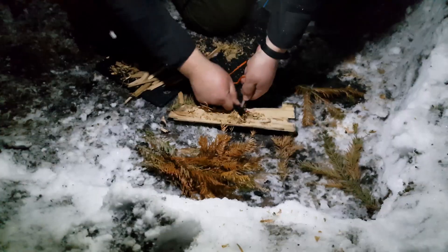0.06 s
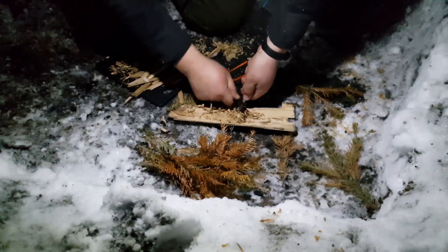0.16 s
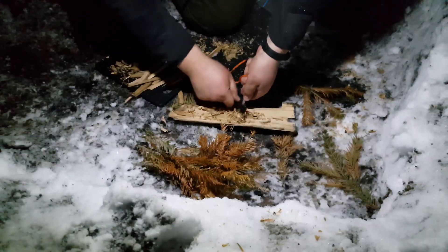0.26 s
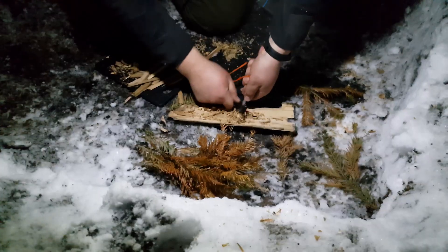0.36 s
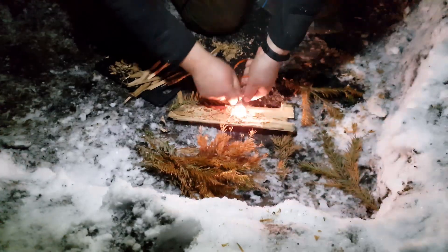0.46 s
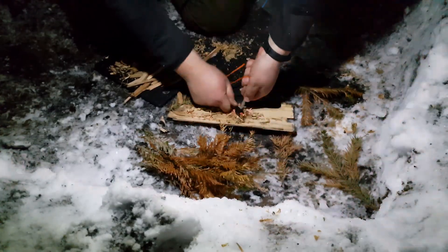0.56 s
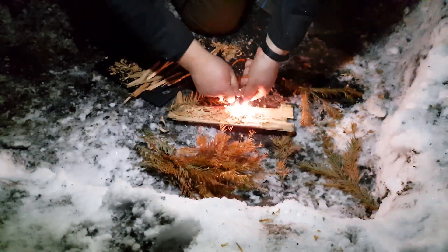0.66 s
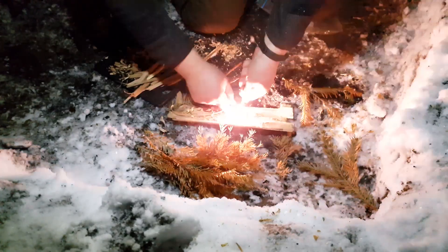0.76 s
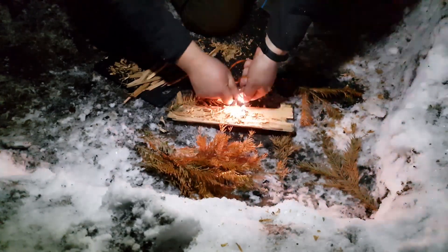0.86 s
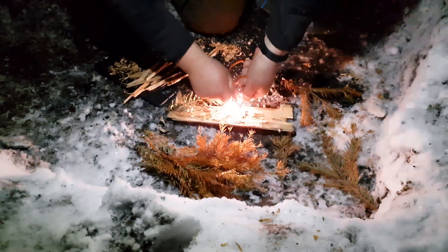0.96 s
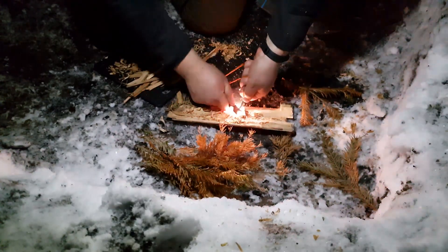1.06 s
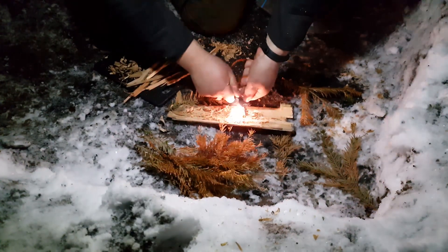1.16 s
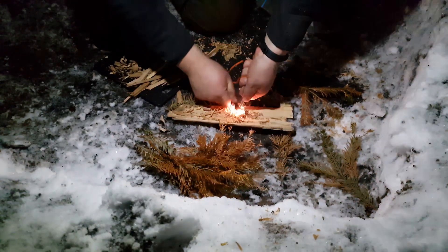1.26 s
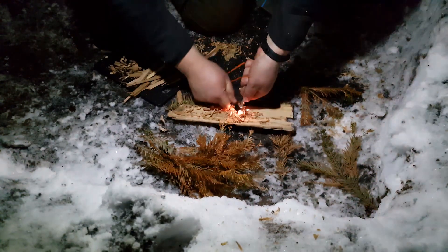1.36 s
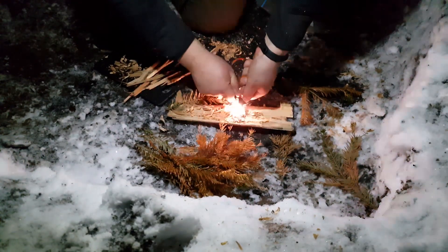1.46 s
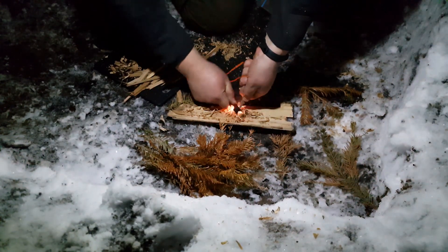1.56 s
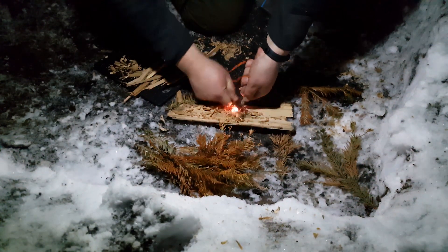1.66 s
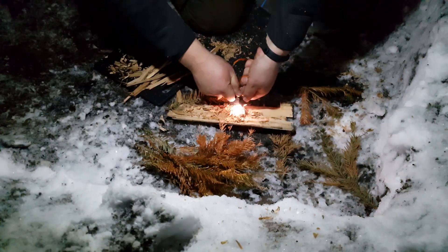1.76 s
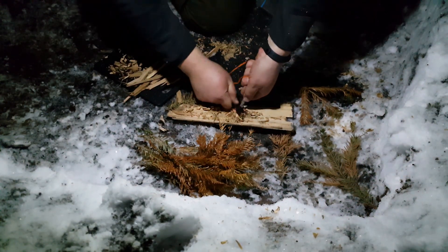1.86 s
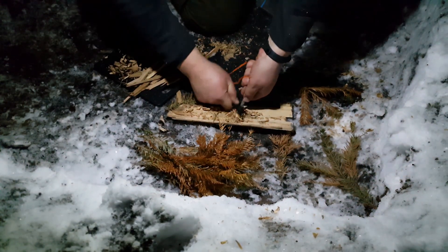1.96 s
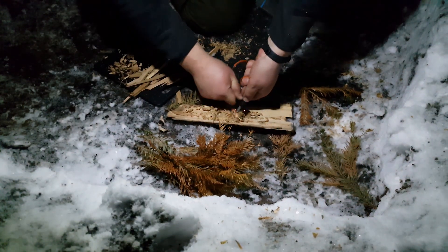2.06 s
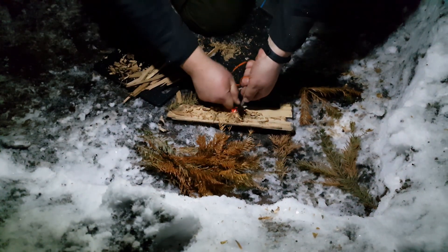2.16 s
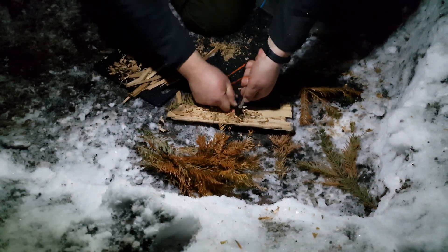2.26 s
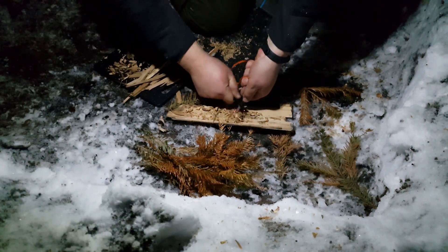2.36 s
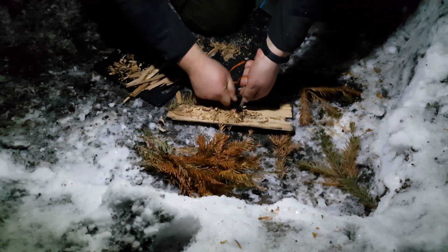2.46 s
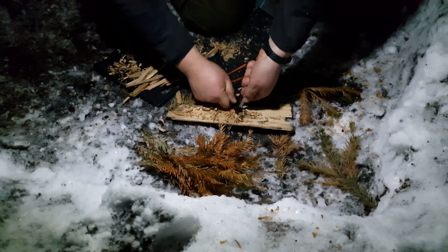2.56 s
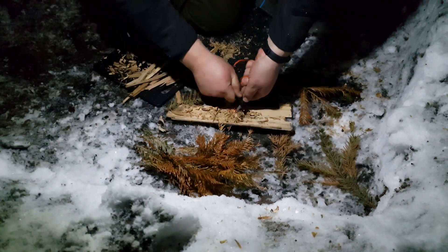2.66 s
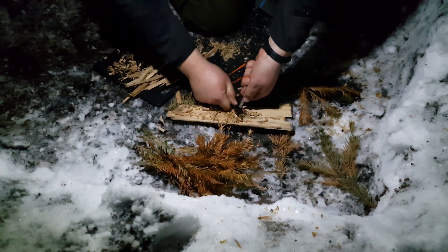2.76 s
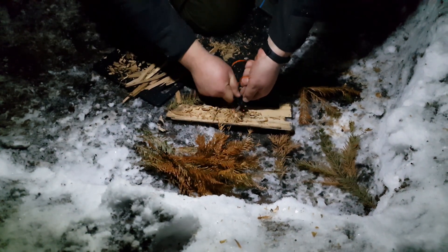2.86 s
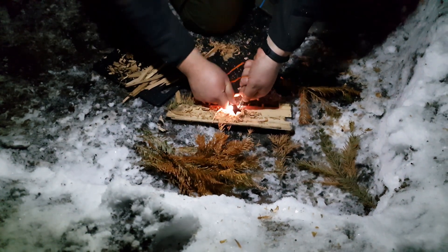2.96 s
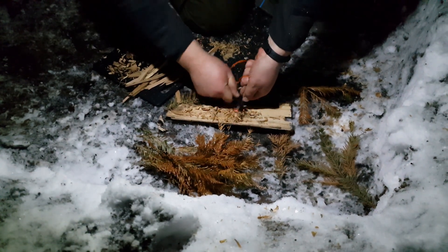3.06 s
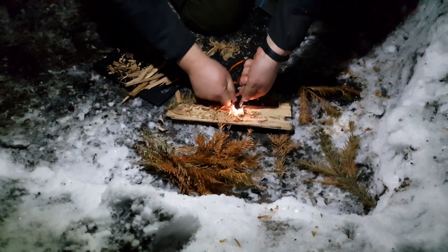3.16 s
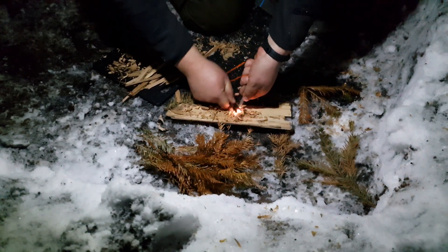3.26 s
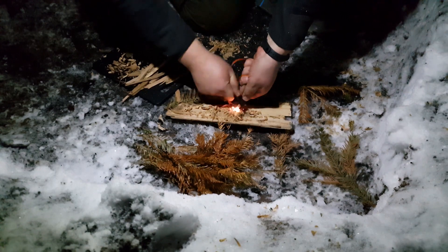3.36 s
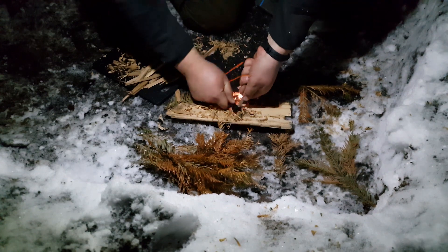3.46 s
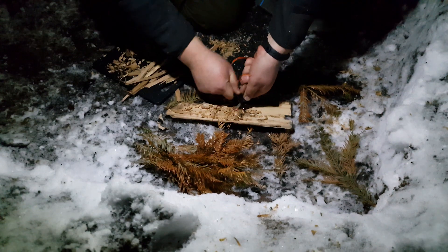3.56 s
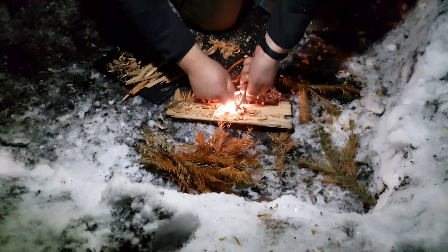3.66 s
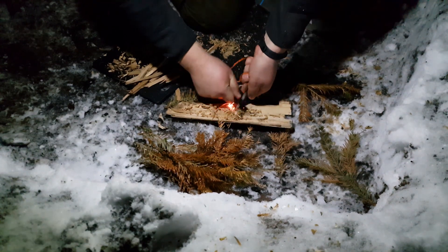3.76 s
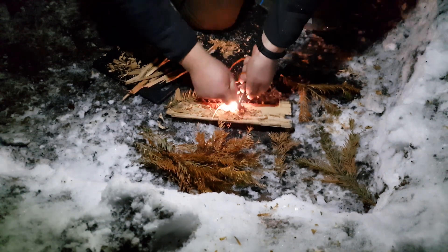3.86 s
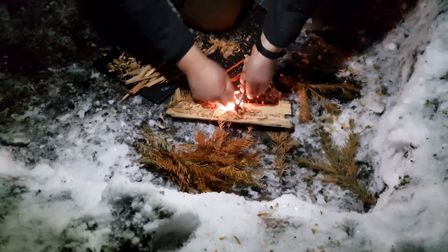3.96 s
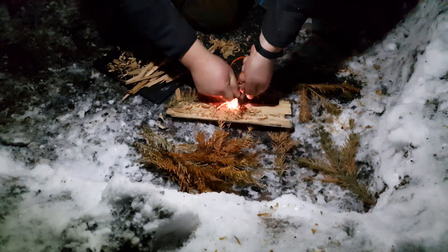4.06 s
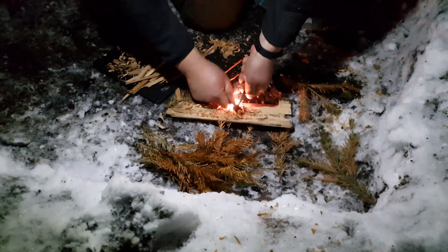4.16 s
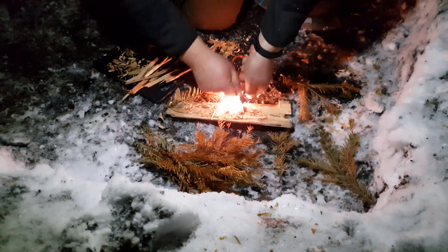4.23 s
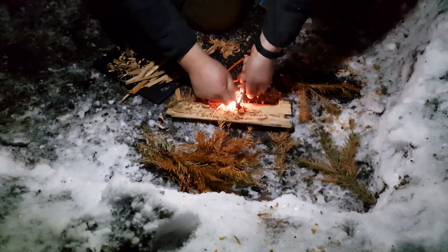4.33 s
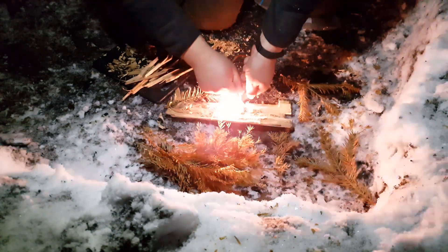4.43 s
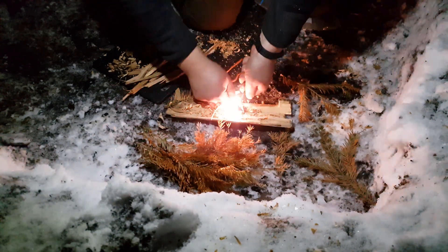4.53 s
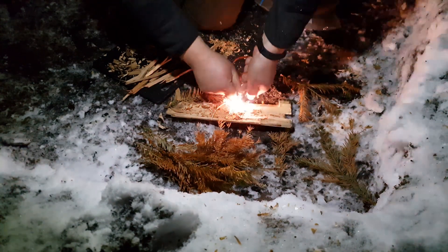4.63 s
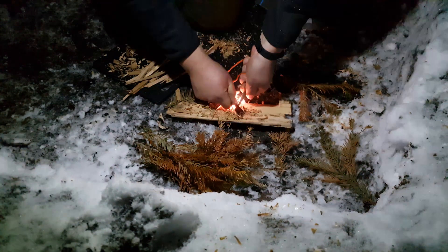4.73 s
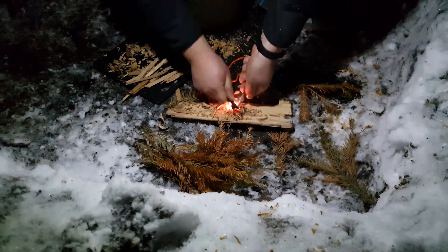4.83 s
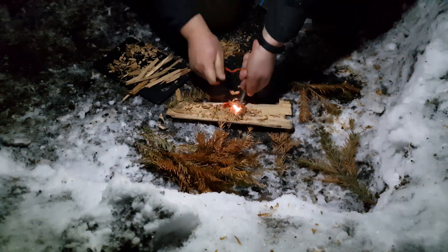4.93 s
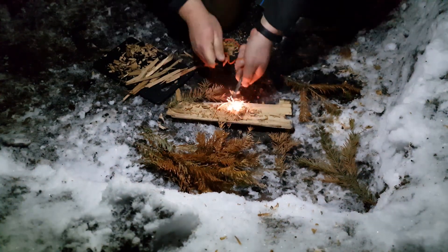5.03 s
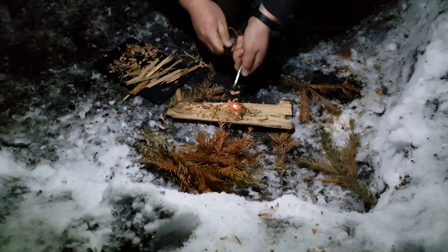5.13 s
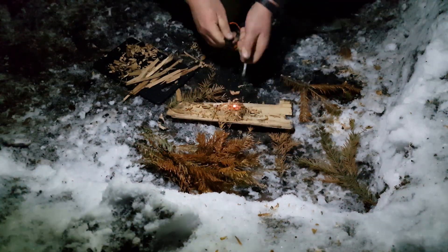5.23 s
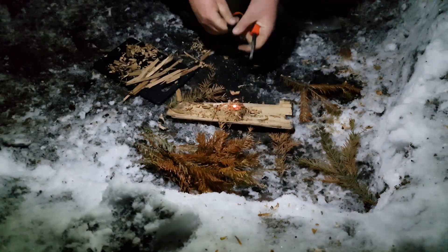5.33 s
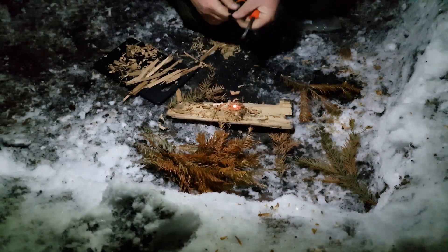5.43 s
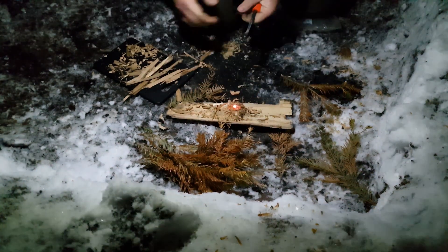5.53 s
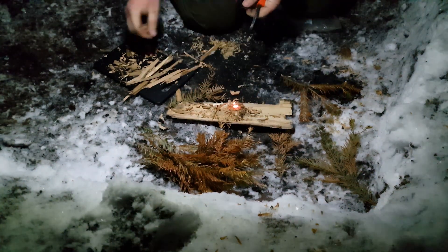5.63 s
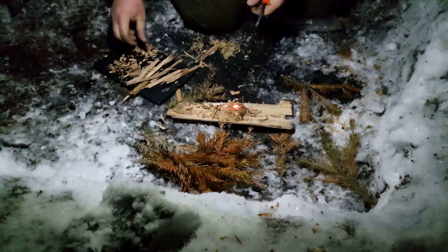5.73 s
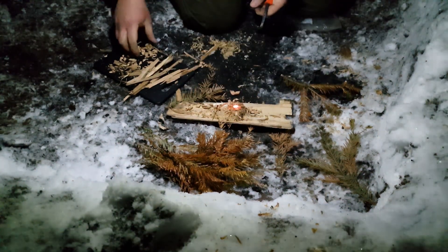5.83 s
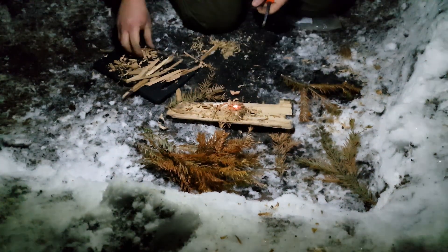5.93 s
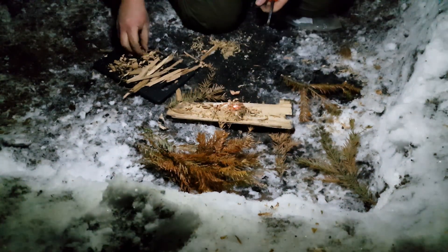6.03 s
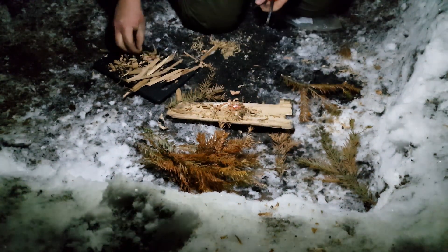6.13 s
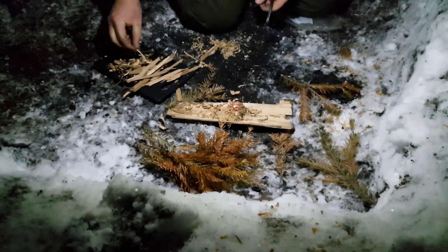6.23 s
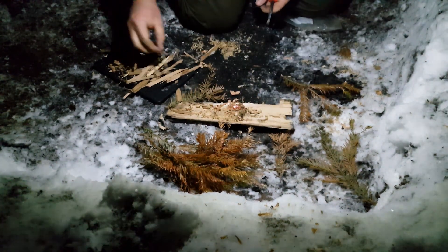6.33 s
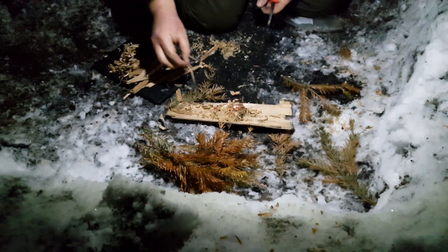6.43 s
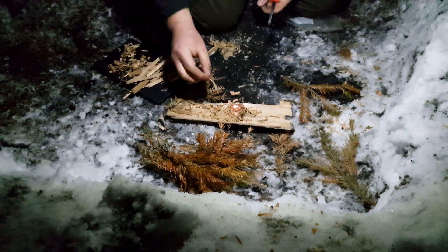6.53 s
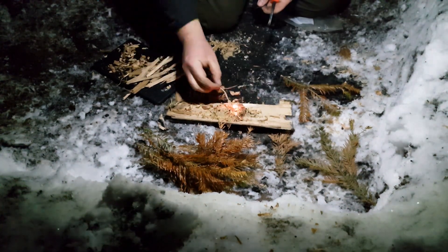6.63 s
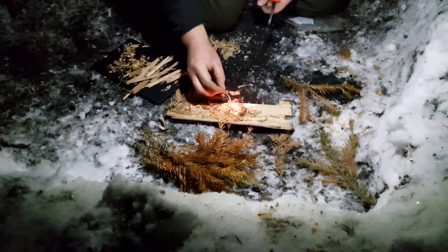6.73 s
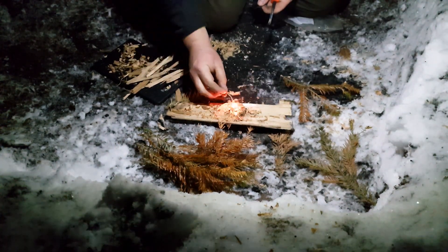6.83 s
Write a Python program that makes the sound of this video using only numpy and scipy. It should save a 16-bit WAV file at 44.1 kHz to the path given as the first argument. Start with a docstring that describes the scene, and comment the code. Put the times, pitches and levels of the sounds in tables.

```python
"""Two ports hear outdoor air noise throughout: shaped random noise that slowly wavers.
A steel striker rubs a ferrocerium rod on a split board in a snow pit, about twelve strokes a second until 4.8 s.
Tiny grit impacts ring board, steel and edge over a low rumble; sharp contacts make knocks.
From 0.4 s burning sparks sizzle and pop: bursts of grit and short contacts through treble resonances.
After 4.8 s the last embers fade, a few faint knocks follow, and sleeves and shavings rustle, rub and tick."""
import sys
import numpy as np
from scipy import signal
from scipy.fft import rfft, irfft
from scipy.io import wavfile
from scipy.ndimage import uniform_filter1d

SR = 44100
rng = np.random.default_rng(int(sys.argv[2]) if len(sys.argv) > 2 else 0)


def transcribe(signal):
    """Save signal, clipped to [-1, 1], as a 16-bit WAV file at the path in sys.argv[1]."""
    frames = np.atleast_2d(signal).T
    limited = np.clip(frames, -1, 1)
    pcm = np.round(limited * 32767).astype(np.int16)
    wavfile.write(sys.argv[1], SR, pcm)


N = 303849
T = np.arange(N) / SR
BIN_HZ = np.fft.rfftfreq(N, 1 / SR)

# Resonances of the wooden board: (pitch_hz, width_hz, level_db)
BOARD = [(235.4, 81, -4), (585.5, 87, -3), (927, 324, 1.5), (1330, 266, 6), (2025, 558, 5), (2320, 346, -2)]
# Resonances of the steel striker and rod: (pitch_hz, width_hz, level_db)
STEEL = [(3250, 160, -5.5), (4334, 1920, 2), (5280, 390, 9), (6130, 1320, 5.5), (7400, 990, -7.5)]
# Bright colour of sparks and shavings: (pitch_hz, width_hz, level_db)
BURN = [(2360, 1170, -13.5), (3730, 1370, -2), (5370, 1100, 1), (7000, 1400, -2.5)]
# Top treble of the same crackle: (pitch_hz, width_hz, level_db)
FIZZ = [(10170, 1700, -1.5), (14900, 4600, -0.3)]
# Last embers, then two moves of sleeves and shavings, one list each:
# (time_s, level_db, top_treble_against_level_db, dull_rub_db)
RUSTLE = [
    [(4.8, -38, -13, -57), (4.9, -42, -8, -65), (4.97, -50.5, -8, -72), (5.01, -49, -11, -75),
     (5.05, -37.5, -5.5, -63), (5.13, -43.5, -13, -65), (5.17, -70, -5, -75)],
    [(5.17, -70, -8, -86), (5.32, -61, -15, -73), (5.47, -61, -7, -66), (5.52, -50, -4, -65),
     (5.58, -51.5, -6, -54.5), (5.6, -67, -10, -69), (5.8, -81, -11, -79.5)],
    [(5.92, -57, -8, -83), (6.0, -52.5, -10, -75), (6.04, -48.5, -8, -60.5), (6.19, -52, -10, -76),
     (6.3, -56, -6.5, -82), (6.45, -63.5, -6, -78), (6.56, -59, -2, -71), (6.68, -62.5, -6.5, -76),
     (6.89, -76, -7, -90)],
]


def undb(db):
    """Turn decibels into a plain gain."""
    return 10 ** (np.asarray(db) / 20)


def level(x, db=0):
    """Scale a sound to the given average (RMS) level."""
    return x * undb(db) / np.sqrt(np.mean(x ** 2))


def shaped(rows):
    """Draw a gain curve in dB over frequency through (pitch_hz, level_db) points."""
    hz, db = np.transpose(rows)
    return np.interp(np.log(BIN_HZ + 1), np.log(hz), db)


def walk(rate, size=N):
    """Random levels, rate new ones a second, joined by straight slopes; their spread is near 1."""
    hold = int(SR / rate)
    steps = np.repeat(rng.standard_normal(size // hold + 1), hold)
    return 1.434 * uniform_filter1d(steps, hold)[:size]


def pair(scattered, size=N):
    """Noise at two ports: the right one mixes the left's noise with a share of its own, so the sound is wider."""
    direct, other = rng.standard_normal((2, size))
    share = np.clip(scattered, 0, 1)
    right = np.sqrt(1 - share) * direct + np.sqrt(share) * other
    return np.array([direct, right])


def resonate(x, pitch_hz, width_hz):
    """One resonance: sound near its pitch passes, and a narrow width rings longer."""
    return signal.lfilter(*signal.iirpeak(pitch_hz, pitch_hz / width_hz, SR), x)


def ring(x, modes, wander_db=0., rate=20):
    """Add up resonances with alternating sign; a shifting grip lets each swell and fade."""
    total = 0
    for k, (hz, width, db) in enumerate(modes):
        gain = undb(db + wander_db * walk(rate))
        total = total + (-1) ** k * gain * resonate(x, hz, width)
    return total


def grit(scatter_db, patchy_db, rate):
    """Sizes of dense tiny impacts, most small and a few large; patchy_db makes them come in patches."""
    size_db = scatter_db * np.minimum(rng.exponential(size=N), 6.5)
    return level(undb(size_db + patchy_db * walk(rate)))


def played(tables, column, fade=0.0036):
    """Gain from level curves, silent between them, with edges smoothed over fade seconds."""
    gain = np.zeros(N)
    for rows in tables:
        rows = np.array(rows)
        active = (T >= rows[0, 0]) * (T < rows[-1, 0])
        gain += undb(np.interp(T, rows[:, 0], column(rows))) * active
    return uniform_filter1d(gain, int(fade * SR), mode="nearest")


def blows(times, peak_db, rattle_s, modes, scattered, vary_db=3.0):
    """Each blow is a sharp contact that rattles for a moment and rings the modes, struck differently each time."""
    size = 2048
    out, t = np.zeros((2, N + size)), np.arange(size) / SR
    for s, db in zip(times, peak_db):
        contact = pair(scattered, size=size) * (t / rattle_s) * np.exp(-t / rattle_s)
        hit = 0
        for k, (hz, width, mode_db) in enumerate(modes):
            gain = undb(mode_db + vary_db * rng.standard_normal())
            hit = hit + (-1) ** k * gain * resonate(contact, hz, width)
        start = int(s * SR)
        out[:, start:start + size] += hit * undb(db) / np.abs(hit).max()
    return out[:, :N]


def air():
    """Outdoor floor noise, its bass alike on both sides and its level slowly wavering."""
    # Balance of the outdoor noise: (pitch_hz, relative_level_db_per_hz)
    air_curve = [(20, -23.5), (35, -8.5), (60, -0.5), (105, -9.5), (175, -9.5), (300, -23.5), (500, -30.5),
                 (1100, -41.5), (1900, -25.5), (2900, -32.5), (6300, -30), (8500, -38), (16000, -36.5)]
    mid, side = rfft(rng.standard_normal((2, N)))
    apart = np.clip(BIN_HZ / 900, .12, .9)  # the sides differ more in the treble
    spectrum = undb(shaped(air_curve)) * (mid + apart * side * np.array([[1], [-1]]))
    return level(irfft(spectrum, N), -62.5) * undb(1.5 * walk(3.3))


def shake(pressing):
    """Pushing and pulling rumbles through board and ground, more while the striker presses."""
    # Rumble while the work goes on: (time_s, level_db)
    shake_curve = [
        [(0.0, -59), (1.4, -57.5), (4.6, -54.5), (4.81, -55.5)],
    ]
    # Resonances of the ground: (pitch_hz, width_hz, level_db)
    ground_modes = [(70.8, 50, -1.5), (151, 72, 0.5), (235, 162, -4)]
    throb = 0.66 + .5 * uniform_filter1d(level(pressing), 900)
    rumble = level(ring(pair(0.069), ground_modes, wander_db=1.3, rate=14))
    return throb * played(shake_curve, lambda r: r[:, 1], fade=0.061) * rumble


def strokes():
    """Board, steel and edge loudness: pressure builds and lets go, swelling or fading along each stroke."""
    # Strokes of the striker: (start_s, length_s, grip: edge pressed hard, held down or eased up,
    # board_db, steel_db, swell_along_stroke_db)
    stroke_rows = [(0.041, 0.076, "down", -39.5, -37, -9), (0.145, 0.053, "up", -43.5, -46.5, -5),
                   (0.232, .061, "down", -40.5, -38, -1), (0.331, 0.038, "up", -38, -44, -4),
                   (0.411, .061, "hard", -39, -38, 7), (0.516, 0.082, "up", -44, -40, -5.5),
                   (0.59, 0.049, "hard", -44, -41, 14), (0.686, 0.056, "up", -41.5, -35.5, -1),
                   (0.776, 0.061, "down", -38, -35, -1.5), (0.863, 0.034, "up", -39, -53, 5),
                   (0.94, 0.051, "down", -38.5, -34.5, 2), (1.03, .065, "down", -41.5, -39, -7.5),
                   (1.105, .048, "up", -38, -34, -1), (1.178, .038, "down", -38, -40, -9),
                   (1.258, .062, "up", -40, -42, 0), (1.34, 0.061, "hard", -43, -43, -5),
                   (1.416, 0.057, "up", -42.5, -38.5, 1.5), (1.508, 0.029, "hard", -39, -37, 4),
                   (1.575, 0.046, "up", -41.5, -44.5, 7), (1.658, .035, "hard", -44.5, -43.5, -4),
                   (1.735, 0.036, "up", -41.5, -43.5, -9.5), (1.805, 0.044, "down", -43, -40.5, -12),
                   (1.874, .052, "up", -43, -38, 5), (1.958, 0.02, "up", -43.5, -48, 11),
                   (2.024, 0.038, "down", -41, -37.5, 6.5), (2.097, .022, "up", -40, -41.5, -2.5),
                   (2.157, 0.044, "down", -43.5, -36.5, 5), (2.234, 0.029, "up", -45, -48, 5),
                   (2.299, 0.039, "down", -39, -40.5, -4.5), (2.373, 0.035, "up", -43, -45.5, 9.5),
                   (2.445, 0.045, "down", -39, -40.5, -4.5), (2.534, .032, "up", -41, -43.5, 4.5),
                   (2.611, 0.046, "up", -41, -37, -1), (2.694, 0.044, "up", -40, -45.5, -17),
                   (2.776, 0.055, "up", -39, -29.5, 3), (2.882, 0.052, "up", -45.5, -49.5, 4),
                   (2.972, 0.034, "up", -36.5, -36.5, 6.5), (3.045, 0.045, "up", -41.5, -40, 4.5),
                   (3.141, 0.053, "down", -41, -41, 9), (3.232, 0.043, "up", -42.5, -39, 0),
                   (3.31, 0.039, "up", -40.5, -40.5, 10.5), (3.407, 0.053, "up", -46.5, -47.5, -2.5),
                   (3.468, 0.049, "down", -43.5, -39, 8), (3.563, 0.042, "up", -46, -46, 14),
                   (3.652, 0.057, "down", -43, -40, 17), (3.737, 0.064, "up", -46.5, -42.5, -4),
                   (3.832, 0.054, "hard", -45, -35.5, 9), (3.91, 0.085, "up", -45.5, -38.5, -4.5),
                   (4.016, 0.15, "up", -45, -38.5, -8), (4.183, 0.035, "down", -39.5, -38, 2.5),
                   (4.253, 0.056, "up", -44.5, -40, 3), (4.358, 0.071, "hard", -44, -39, 5.5),
                   (4.453, 0.06, "up", -42.5, -37, -4.5), (4.53, 0.1, "down", -45, -40, -1.5),
                   (4.627, 0.033, "down", -43.5, -38.5, -1), (4.684, 0.1, "up", -46.5, -43.5, 10.5)]
    # Edge hiss against the steel for each grip [dB]: pressed down it cuts and hisses, eased up it only slides
    edge_against_steel_db = {"hard": 0.5, "down": -3.5, "up": -7}
    rise_s, fall_s = 0.0061, 0.0072
    lead_s, bite_s, lift_s = .004, 0.0034, .0035  # the edge bites early and quickly, and lifts early
    board, steel, edge = np.zeros((3, N))
    for s, length, grip, board_db, steel_db, swell_db in stroke_rows:
        span = slice(max(int((s - .06) * SR), 0), int((s + length + 0.12) * SR))
        t = T[span] - s
        swell = undb(swell_db * (np.clip(t / length, 0, 1) - .5))
        touch = np.exp(np.minimum(t / rise_s, 0) + np.minimum((length - t) / fall_s, 0))
        bite_in = np.minimum((t + lead_s) / bite_s, 0)
        bite = np.exp(bite_in + np.minimum((length - lift_s - t) / fall_s, 0))
        board[span] += touch * swell * undb(board_db)
        steel[span] += bite * swell * undb(steel_db)
        edge[span] += bite * swell * undb(steel_db + edge_against_steel_db[grip])
    return board, steel, edge


def scrape(board, steel, edge):
    """Stroke by stroke the same grit drives the resonances of board, steel and edge."""
    # Resonances of the scraping edge: (pitch_hz, width_hz, level_db)
    edge_modes = [(10190, 890, -7), (12300, 2700, 0), (13300, 500, 3), (15400, 780, 0)]
    rough = grit(scatter_db=3.4, patchy_db=2.2, rate=250)
    wood = board * level(ring(rough * pair(.1), BOARD, wander_db=2.5, rate=41))
    rod = steel * level(ring(rough * pair(0.68), STEEL, wander_db=2.0, rate=50))
    hiss = edge * level(ring(rough * pair(.55), edge_modes, wander_db=3.0, rate=37))
    return wood + rod + hiss


def knocks():
    """Knocks on the board: a clack and thud of wood and a chink of steel, the last few faint."""
    # Knocks on the board: (time_s, peak_db, low_thud_against_peak_db, steel_ring_against_peak_db)
    knock_rows = [(0.1421, -17.5, -28, -28), (0.3265, -12.5, -25, -7.5), (0.474, -19, -42, -18),
                  (0.8121, -12, -37, 0.5), (1.2988, -19.5, -14, -5), (1.4534, -16.5, -23, -7),
                  (1.6137, -14.5, -21, -16), (1.7564, -11, -18, -3), (2.0902, -22.5, -32, -22),
                  (2.0955, -22, -28, -14), (2.113, -25, -27, -16), (2.9928, -14.5, -13, -21),
                  (3.0048, -20.5, -25, -7), (3.0579, -21, -16, -20), (3.1846, -17, -11, -27),
                  (3.3483, -14.5, -16, -8.5), (3.5167, -20.5, -7, -23), (4.0431, -10, -10.5, -27),
                  (4.581, -16, -9, -19), (5.5764, -42.5, 8.5, -10), (5.6998, -44, -11, 1),
                  (6.0112, -52, 1, 6), (6.57, -40.5, -1.5, -10)]
    wood_rattle_s, chink_rattle_s = 0.00037, .0011
    s, db, thud_db, steel_db = np.transpose(knock_rows)
    clack = blows(s, db, wood_rattle_s, BOARD[3:], 0.22)
    thud = blows(s, db + thud_db, wood_rattle_s, BOARD[1:3], 0.14)
    chink = blows(s, db + steel_db, chink_rattle_s, STEEL, 0.32)
    return clack + thud + chink


def crackle(body, top):
    """Ring dense impacts in the bright colour and top treble that sparks and shavings share."""
    # a reference noise through one resonance sets the common scale
    unit = np.std(resonate(rng.standard_normal(SR), 5300, 5300 / 1.2))
    bright = ring(body * pair(0.93), BURN, wander_db=1.5, rate=45)
    fizz = ring(top * pair(0.98), FIZZ, wander_db=2.5, rate=45)
    return (bright + fizz) / unit


def sizzle():
    """Sparks burn in the shavings as dense tiny bursts of uneven size."""
    # Sparks burning, one list per spell: (time_s, level_db)
    sizzle_curves = [
        [(0.4, -44), (0.624, -46), (0.784, -39), (0.96, -38.5), (1.184, -37.5), (1.466, -46.5), (1.754, -48),
         (1.858, -42.5), (1.95, -72)],
        [(2.95, -68), (3.026, -38), (3.162, -55), (3.33, -38.5), (3.4, -68)],
        [(3.62, -57), (3.76, -36), (3.85, -60), (3.912, -38), (4.496, -40.5), (4.72, -38.5), (4.8, -43)],
    ]
    loudness = played(sizzle_curves, lambda r: r[:, 1], fade=0.015)
    bursts = loudness * grit(scatter_db=4.5, patchy_db=0.0, rate=30)
    return crackle(bursts, undb(-10) * bursts)  # top treble driven 10 dB lower


def ticks():
    """Single spark pops and shaving ticks: very short contacts ring the crackle's colour."""
    # Pops and ticks: (time_s, peak_db, top_treble_against_peak_db)
    tick_rows = [(0.5303, -21.5, -9), (0.7068, -17.5, -10), (0.9454, -26.5, 11), (1.087, -18, -20),
                 (1.15, -17, -25), (1.2166, -35, -13), (1.5043, -23.5, -13), (1.626, -19.5, -26),
                 (1.842, -28, 7), (3.043, -17, -19), (3.0653, -21, -19), (3.0888, -23.5, -10),
                 (3.1077, -27.5, -6), (3.3315, -20.5, -26), (3.468, -23, -22.5), (4.069, -18, -23),
                 (4.2486, -19, -19), (4.419, -20, -25), (4.6988, -22.5, -5), (4.743, -32, 8),
                 (4.8699, -21.5, -8), (4.9387, -24.5, -5), (4.9767, -23.5, -2.5), (5.1287, -27.5, -11),
                 (5.151, -38.5, -6), (5.9456, -40.5, -5), (6.013, -39, -20), (6.0454, -37, -1),
                 (6.1726, -36, -3), (6.392, -41.5, -12), (6.445, -43, 4), (6.478, -37, -10),
                 (6.5, -43, -12), (6.542, -45, 0), (6.5697, -34.5, -7), (6.6058, -45.5, 4),
                 (6.6746, -44, -28), (6.8174, -54, -13.5), (6.869, -48.5, -13)]
    rattle_s = 0.00088
    s, db, top_db = np.transpose(tick_rows)
    return blows(s, db, rattle_s, BURN, 0.98) + blows(s, db + top_db, rattle_s, FIZZ, 0.61)


def rustle():
    """Last embers, then sleeves and shavings: patchy tiny impacts crackle."""
    impacts = grit(scatter_db=3.5, patchy_db=2.0, rate=170)
    body = impacts * played(RUSTLE, lambda r: r[:, 1])
    top = impacts * played(RUSTLE, lambda r: r[:, 1] + r[:, 2])
    return crackle(body, top)


def rub():
    """Cloth adds a dull rub: smooth noise through lower resonances."""
    # Resonances of the cloth: (pitch_hz, width_hz, level_db)
    cloth_modes = [(773, 160, -1), (1230, 480, -6.5), (1600, 150, -1), (3550, 170, -4)]
    cloth = level(ring(pair(0.69), cloth_modes, wander_db=1.0, rate=11))
    return played(RUSTLE, lambda r: r[:, 3]) * cloth


def lean(work):
    """The work is nearer the left port: levels differ with pitch, and the right port hears it later."""
    # Left against right: (pitch_hz, left_minus_right_db)
    lean_curve = [(60, -2.5), (110, 3.5), (200, 2), (380, 5.5), (700, 4.5), (1290, 7.5), (2380, 9.5),
                  (4400, 7), (8120, 6.5), (15000, 4)]
    lag_s = 1.6e-5
    side = np.array([[.5], [-.5]])
    lag = np.exp(2j * np.pi * BIN_HZ * lag_s * side)
    return irfft(rfft(work) * undb(shaped(lean_curve) * side) * lag, N)


def scene():
    """Lean all the close work to the left and add the outdoor air."""
    board, steel, edge = strokes()
    work = shake(board) + scrape(board, steel, edge) + knocks()
    work = work + sizzle() + ticks() + rustle() + rub()
    return lean(work) + air()


def record(dry):
    """The microphone housing dips the lower treble; a steep filter cuts the top."""
    dip_hz, dip_width_hz, dip_share, top_hz = 8920, 1300, 0.27, 15950
    dipped = dry - dip_share * resonate(dry, dip_hz, dip_width_hz)
    return signal.sosfilt(signal.ellip(10, .2, 75, top_hz, fs=SR, output="sos"), dipped)


dry = scene()
out = record(dry)
transcribe(out)
```